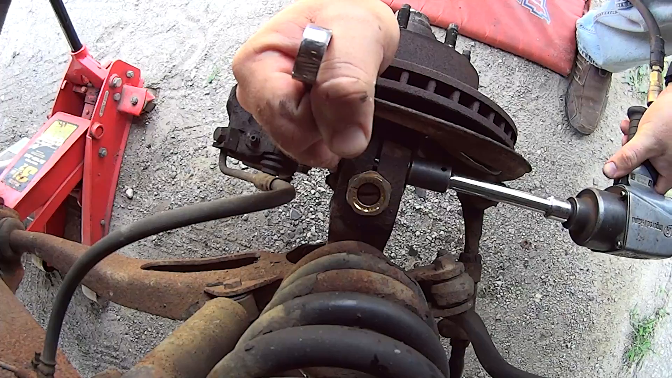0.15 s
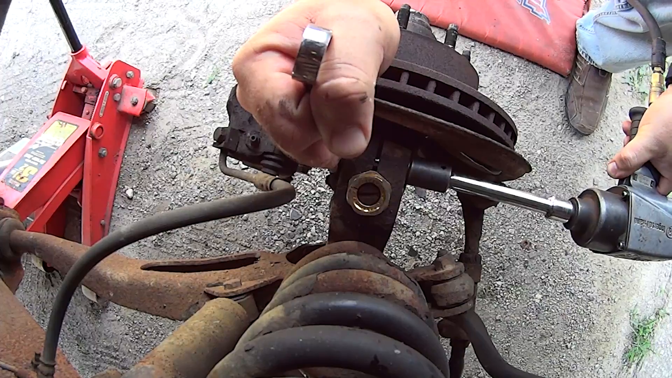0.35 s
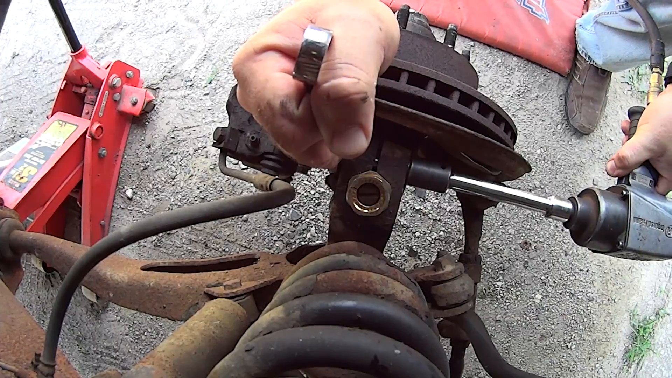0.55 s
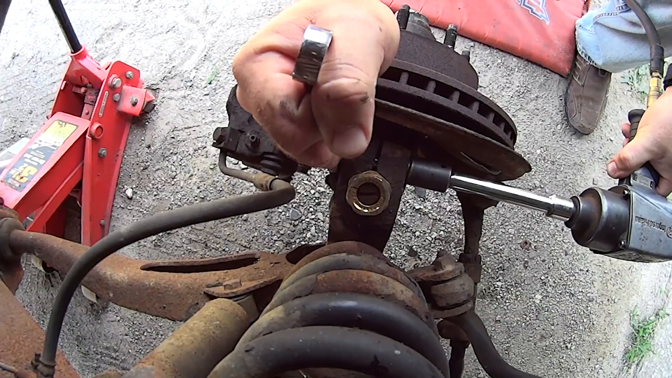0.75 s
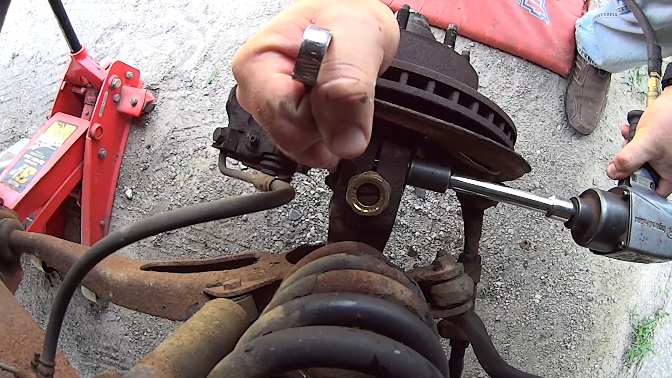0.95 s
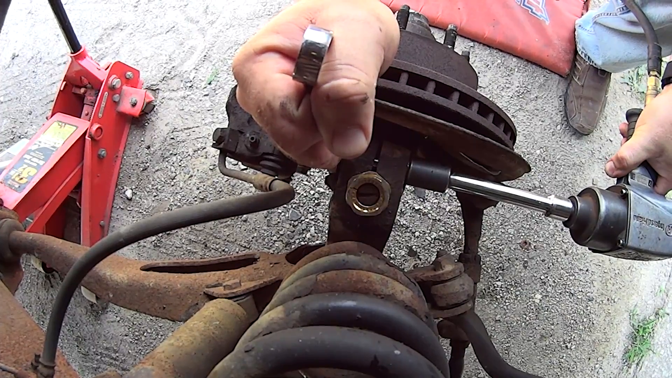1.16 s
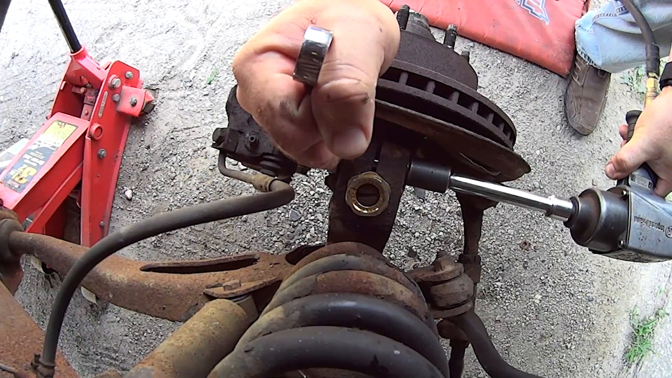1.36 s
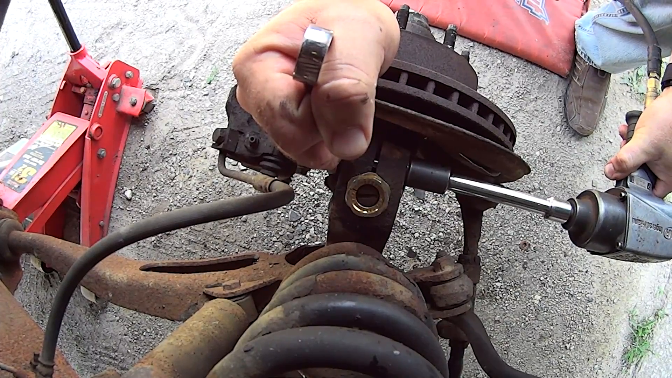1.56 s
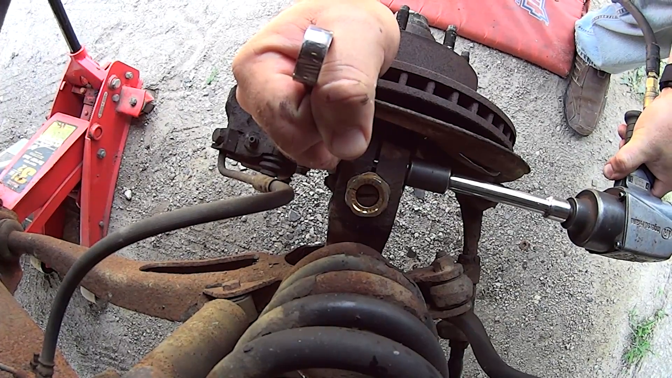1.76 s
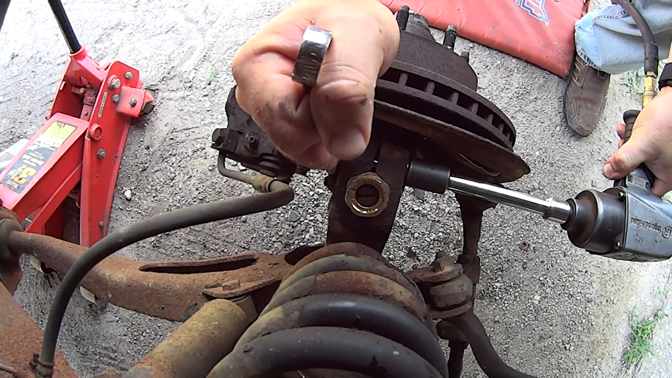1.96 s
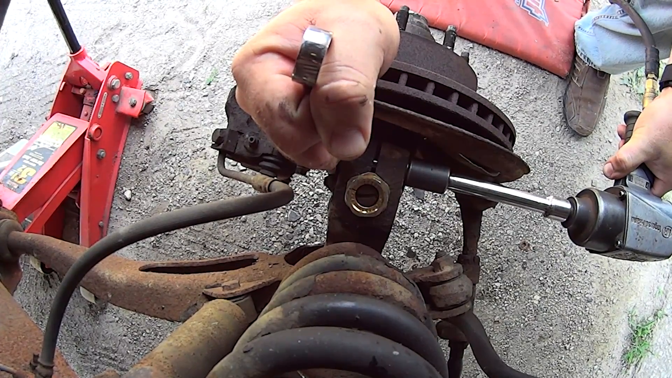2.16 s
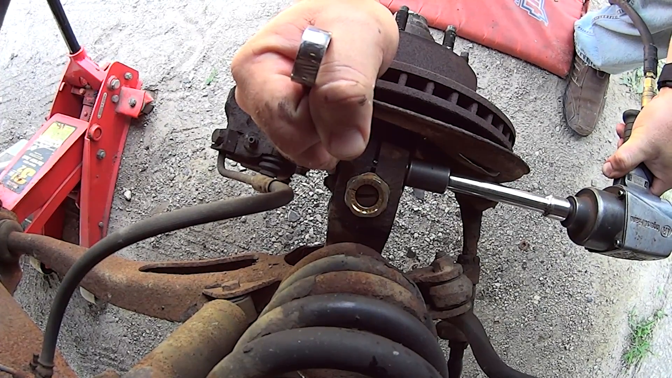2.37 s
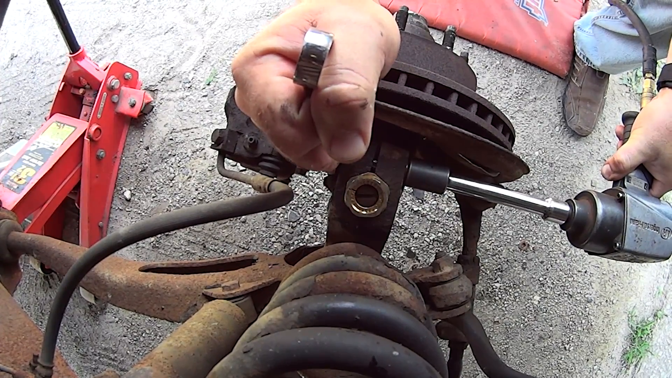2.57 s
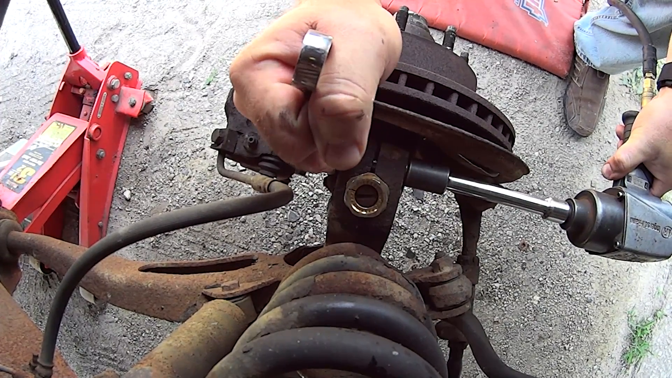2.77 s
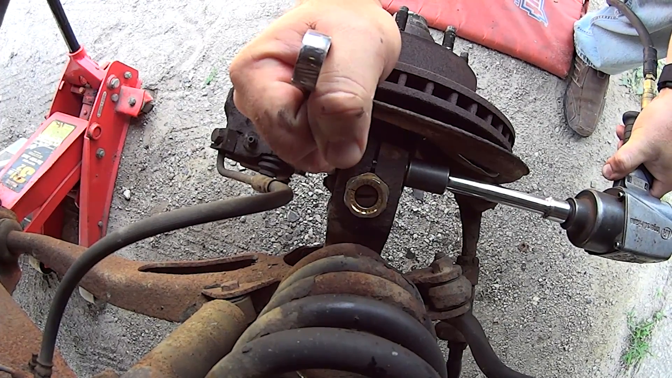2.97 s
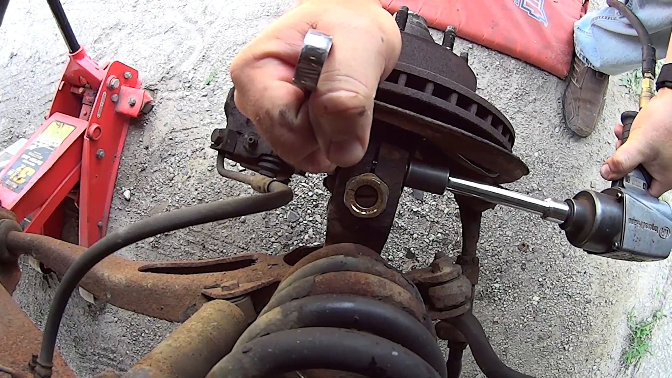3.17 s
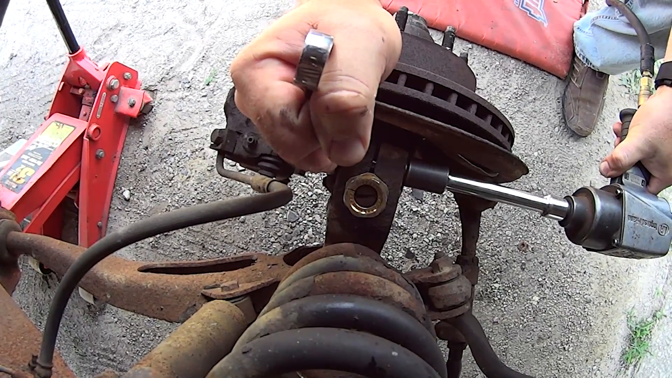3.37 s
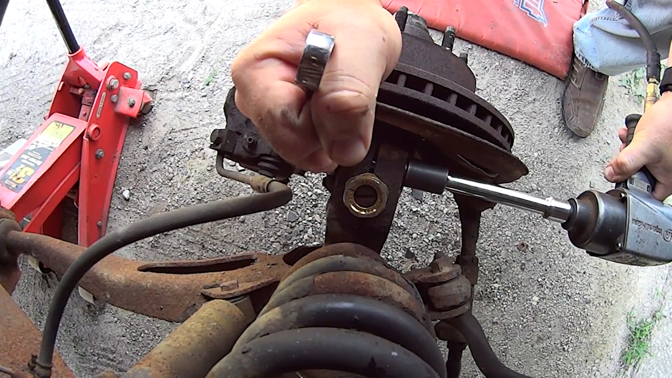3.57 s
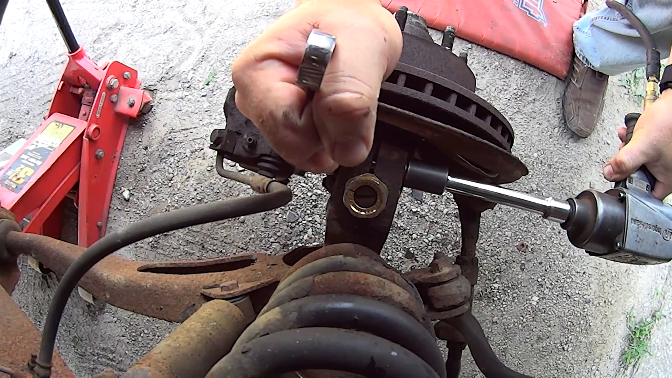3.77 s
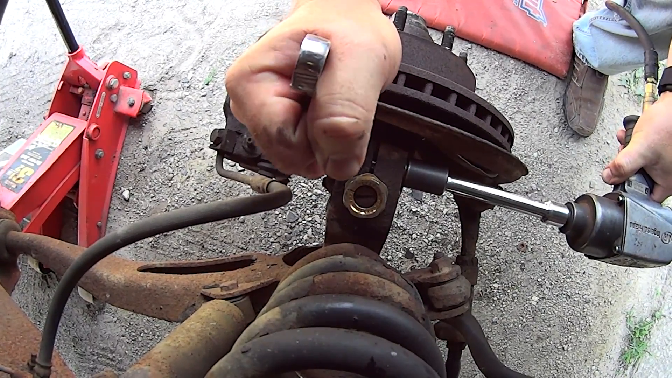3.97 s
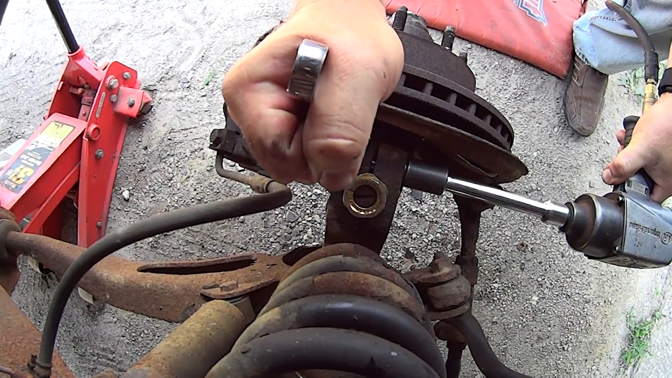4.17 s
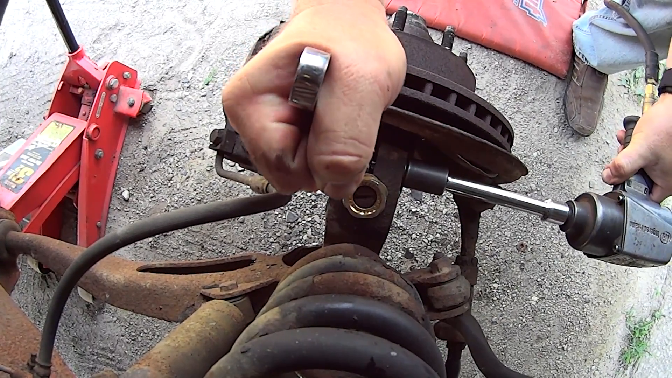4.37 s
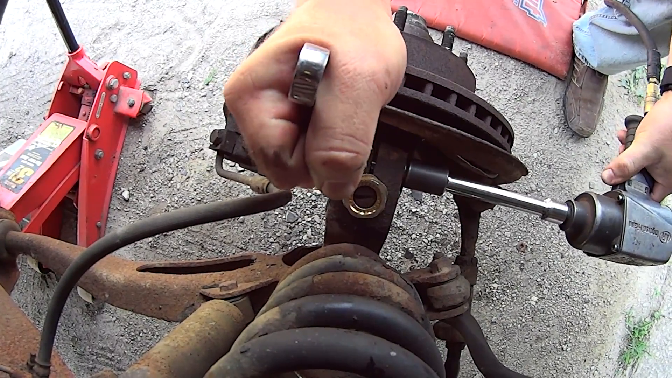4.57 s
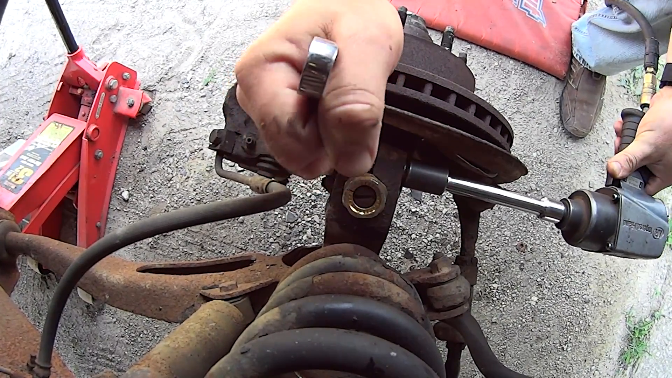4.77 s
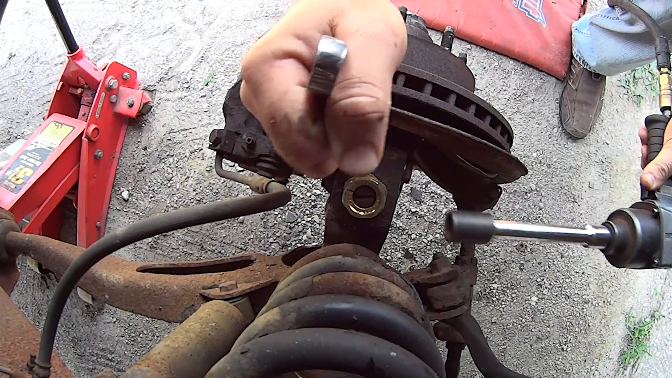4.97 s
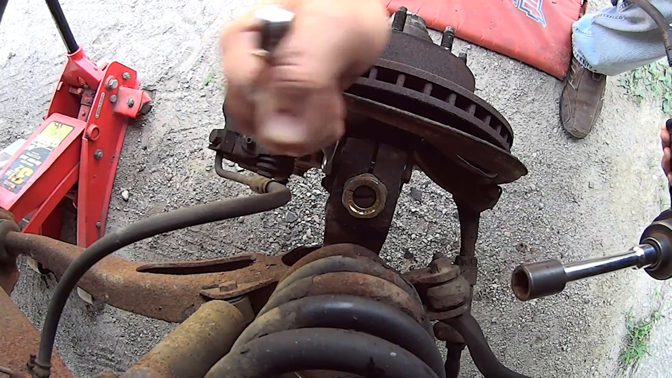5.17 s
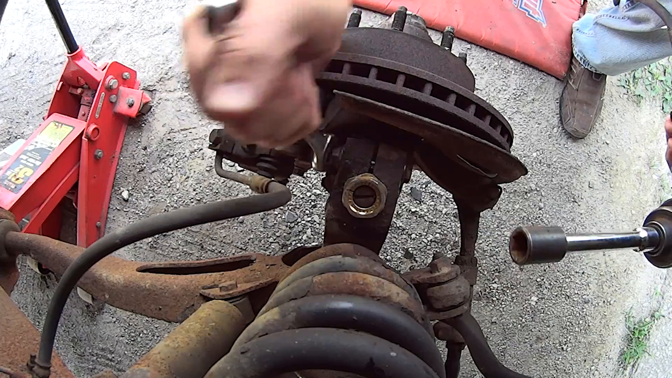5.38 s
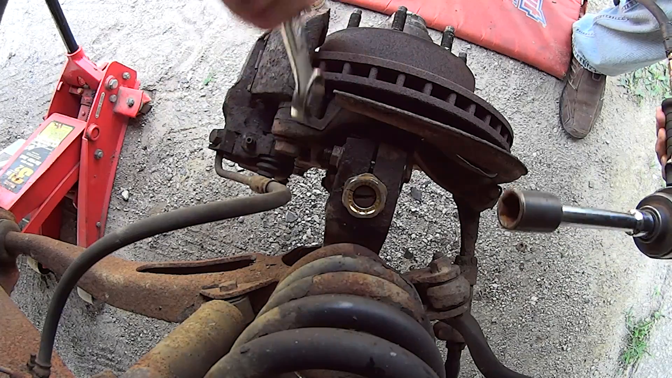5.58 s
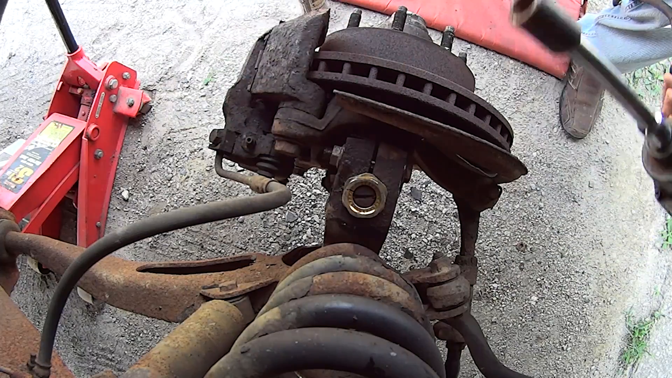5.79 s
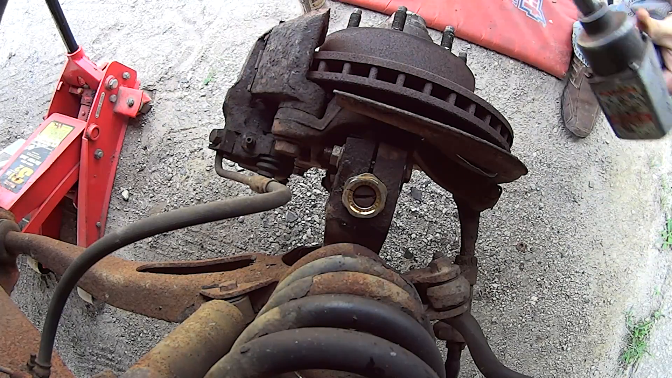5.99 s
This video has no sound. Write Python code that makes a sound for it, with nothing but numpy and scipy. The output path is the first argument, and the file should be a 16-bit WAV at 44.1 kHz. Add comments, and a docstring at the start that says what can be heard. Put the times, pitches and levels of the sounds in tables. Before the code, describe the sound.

Close by, a pneumatic impact wrench gives a short burst, then a long hissing, clanging run, ending with a few soft tool clinks.

```python
"""An air impact wrench tightens a bolt on a car's steering knuckle, close by, over outdoor rumble and hum.
A short burst and a few clinks lead into a long run from 0.35 s: about 17 times a second the hammer
cracks on the anvil, the suspension answers with a falling clang, and the motor spins up with a hiss
and a rattle. The bolt seats near 1.6 s; from 2.2 to 3.2 s the socket rides askew and chinks. At 4.6 s
the trigger is let go and the socket comes off ringing; after 5.1 s a spanner clinks off the nut."""
import sys
import numpy as np
from scipy import signal
from scipy.fft import rfft, irfft, next_fast_len
from scipy.io import wavfile
from scipy.ndimage import uniform_filter1d, minimum_filter1d

SR = 44100
rng = np.random.default_rng(int(sys.argv[2]) if len(sys.argv) > 2 else 0)


def pcm_store(signal):
    """Save signal as 16-bit PCM."""
    levels = np.round(np.clip(np.atleast_2d(signal), -1, 1) * 32767)
    wavfile.write(sys.argv[1], SR, levels.astype(np.int16).T)


N = 265913
TIME_S = np.arange(N) / SR
CUTOFF_HZ = 11100
SIDE_SIGN = np.array([[1], [-1]])


def from_db(db):
    """Decibels to gain."""
    return 10 ** (np.asarray(db) / 20)


def at_hz(curve, hz):
    """Interpolate a curve over log frequency."""
    knots_hz, values = np.transpose(curve)
    return np.interp(np.log(hz + 1e-9), np.log(knots_hz), values)


def noise(spectrum, peaks, side_db):
    """Stereo noise: broad spectrum plus resonances, rms 1."""
    size = next_fast_len(N)
    hz = np.fft.rfftfreq(size, 1 / SR)
    peaks_db = sum(db / (1 + (2 * (hz - peak_hz) / width_hz) ** 2) for peak_hz, width_hz, db in peaks)
    gain = from_db(at_hz(spectrum, hz) + peaks_db) * (hz < CUTOFF_HZ)
    mid, side = irfft(rfft(rng.standard_normal((2, size))) * gain, size)[:, :N]
    stereo = mid + from_db(side_db) * side * SIDE_SIGN
    return stereo / np.sqrt(np.mean(stereo ** 2) + 1e-20)


def clicks(times_s, level_db):
    """One impulse per contact."""
    return np.bincount(np.clip(times_s * SR, 0, N - 1).astype(int), from_db(level_db), N)


def convolve(x, response):
    """Apply an impulse response."""
    return signal.oaconvolve(np.atleast_2d(x), np.atleast_2d(response), axes=1)[:, :N]


def dense_steel(hits, colour, envelope, repeat_share):
    """Countless close modes: part of the ring repeats from hit to hit, the rest is new."""
    repeated = convolve(hits, colour[:, :len(envelope)] * envelope)
    fresh = colour * np.sqrt(np.abs(convolve(hits ** 2, envelope ** 2)))
    return np.sqrt(repeat_share) * repeated + np.sqrt(1 - repeat_share) * fresh


def pings(times_s, level_db, modes, spread_db):
    """Struck, damped modes: random strength per hit, random pan per mode."""
    stereo = np.zeros((2, N))
    for hz, mode_db, t60_s in modes:
        hits = clicks(times_s, level_db + mode_db + spread_db * rng.uniform(-1, 1, len(times_s)))
        radius, angle = from_db(-60 / (t60_s * SR)), 2 * np.pi * hz / SR
        feedback = [1, -2 * radius * np.cos(angle), radius ** 2]
        ring = signal.lfilter([0, np.sin(angle)], feedback, hits + 1e-18)
        stereo += ring * from_db(rng.uniform(-2.2, 3.9) * SIDE_SIGN)
    return stereo


# outdoor noise (frequency [Hz], level [dB])
OUTDOOR_SPECTRUM = [(15, -27), (25, -22), (59, -20), (92, -4.5), (141, -6), (247, -6.5), (336, -6.5),
                    (412, -8), (651, -25.5), (930, -25), (1760, -31), (2270, -29.5), (2930, -33.5),
                    (5670, -31.5), (11000, -40), (14300, -88), (22000, -120)]
# its resonances (frequency [Hz], width [Hz], gain [dB])
OUTDOOR_PEAKS = [(140, 46, 0), (225, 44, 4.5), (310, 97, -6), (410, 50, -9), (945, 75, 11), (1253, 200, 3),
                 (2280, 180, 6.5), (3240, 230, 8.5), (4240, 280, 7.5), (5660, 280, 6.5), (6600, 570, 7.5),
                 (8420, 1500, -2)]
# machine hum (frequency [Hz], level [dB])
HUM_LINES = [(68, -65), (134.6, -58.5), (183, -61.5), (334, -64), (377, -66.5), (700, -76.5)]

def surroundings(air_db=-52, waver_cycles=0.42, waver_step_s=0.1):
    """Outdoor rumble, thin hiss and a distant machine's wavering hum."""
    knots_s, hum = np.arange(0, TIME_S[-1] + 1, waver_step_s), 0
    for hz, db in HUM_LINES:
        drift = waver_cycles * np.interp(TIME_S, knots_s, rng.standard_normal(len(knots_s)))
        hum += from_db(db) * np.sqrt(2) * np.sin(2 * np.pi * (hz * TIME_S + drift))
    return from_db(air_db) * noise(OUTDOOR_SPECTRUM, OUTDOOR_PEAKS, side_db=-9.5) + hum


# trigger (pulled [s], let go [s], motor stops [s])
TRIGGER_PULLS = [(-0.1, .137, 0.215), (0.301, 4.62, 4.655)]
# air flow, valve open (time [s], level [dB])
OPEN_FLOW = [(0, -17.5), (.36, -18), (.7, -19.5), (1.1, -17.5), (1.5, -21), (2, -18.3), (3, -21.5),
             (3.6, -19.5), (4.6, -20)]

def throttle(open_s=0.034, shut_s=0.0083, stop_s=0.006, coast_db=-11, coast_db_per_s=110):
    """Air flow in dB: builds on each pull, sinks as the motor coasts, stops with it."""
    flow = 0
    for pulled_s, let_go_s, stopped_s in TRIGGER_PULLS:
        opening = 1 - np.exp(-np.maximum(TIME_S - pulled_s, 0) / open_s)
        coast_s = np.maximum(TIME_S - let_go_s, 0)
        shutting = np.maximum(np.exp(-coast_s / shut_s), from_db(coast_db - coast_db_per_s * coast_s))
        stopping = np.exp(-np.maximum(TIME_S - stopped_s, 0) / stop_s)
        flow += opening * shutting * stopping
    return np.interp(TIME_S, *np.transpose(OPEN_FLOW)) + 20 * np.log10(flow + 1e-6)


# exhaust hiss (frequency [Hz], level [dB])
EXHAUST_SPECTRUM = [(25, -35), (60, -12), (130, -5), (230, 2.5), (380, 2), (650, 4), (1000, 4), (1450, -2),
                    (1700, -2.5), (2900, 0.5), (3700, -7), (5800, -2.5), (7400, -7.5), (9200, -6.5),
                    (11000, -26)]
# its resonances (frequency [Hz], width [Hz], gain [dB])
EXHAUST_RESONANCES = [(2185, 140, 8.6), (9400, 250, 3)]

def exhaust(blows_s, flow_db, stall_db=-12, stall_s=0.029, ramp_s=0.0053,
            load_db=-6, load_s=0.0057, vane_hz=620, puff_depth=0.36):
    """Each blow stalls the motor; air swells on spin-up and dips as the cam loads. Each vane puffs."""
    next_blow = np.searchsorted(blows_s, TIME_S)
    since_s = TIME_S - np.r_[-stall_s, blows_s][next_blow]
    until_s = np.r_[blows_s, np.inf][next_blow] - TIME_S
    speed = 0.5 + 0.5 * np.tanh((since_s - stall_s) / ramp_s)
    load = 0.5 + 0.5 * np.tanh((load_s - until_s) / ramp_s)
    puffs = 1 + puff_depth * np.sin(2 * np.pi * np.cumsum(vane_hz * speed) / SR)
    level_db = flow_db + stall_db * (1.5 - speed) + load_db * load
    return from_db(level_db) * puffs * noise(EXHAUST_SPECTRUM, EXHAUST_RESONANCES, side_db=-7)


def chatter(level_db, mean_gap_s=0.009, range_db=6):
    """The socket shakes unevenly on the bolt head."""
    slots_s = np.arange(0, N / SR - 2 * mean_gap_s, mean_gap_s)
    delay, softness = rng.random((len(slots_s), 2)).T
    times_s = slots_s + mean_gap_s * delay
    return clicks(times_s, level_db[(times_s * SR).astype(int)] - range_db * softness)


def tightening(times_s, loose_db, tight_db, midpoint_s=1.61, ramp_s=0.36):
    """A level that moves from loose to tight as the bolt seats."""
    tightness = 0.5 + 0.5 * np.tanh((times_s - midpoint_s) / ramp_s)
    return loose_db + (tight_db - loose_db) * tightness


# steady stretches of hammering (start [s], blow rate [Hz])
HAMMER_PACE = [(.021, 18.5), (.354, 18.63), (.944, 20.55), (1.236, 17.5), (1.807, 18.6), (2.075, 17.65),
               (2.302, 19.95), (2.503, 11.9), (2.587, 19.2), (2.639, 16.7), (2.997, 16.1), (3.183, 10.5),
               (3.278, 18.5), (3.480, 16.5), (3.843, 15.97)]
# blow passed into the suspension (time [s], level [dB])
SUSPENSION_DRIVE = [(0, -17), (.55, -17.5), (.98, -18.5), (1.1, -21.5), (1.62, -18.5), (1.85, -24),
                    (2.45, -22), (2.6, -23.5), (3.17, -23), (3.4, -25.5), (3.6, -19), (3.75, -22),
                    (4.05, -19), (4.6, -17.5)]

def hammer(usual_wind_up_s=0.063, wind_up_db_per_s=209, crack_scatter_db=2.6, ring_scatter_db=1.87):
    """Blows while the trigger is held; a longer wind-up or a tighter bolt cracks harder."""
    starts_s, rates_hz = np.transpose(HAMMER_PACE)
    stretches = zip(starts_s, np.r_[starts_s[1:], N / SR], rates_hz)
    blows_s = np.concatenate([np.arange(start, end - 0.5 / hz, 1 / hz) for start, end, hz in stretches])
    wind_up_s = 1 / rates_hz[np.searchsorted(starts_s, blows_s, side="right") - 1]
    crack_draw, ring_draw = rng.standard_normal((len(blows_s), 2)).T
    crack_db = tightening(blows_s, loose_db=-16.5, tight_db=-15.5)
    crack_db += wind_up_db_per_s * (wind_up_s - usual_wind_up_s) + crack_scatter_db * crack_draw
    ring_db = np.interp(blows_s, *np.transpose(SUSPENSION_DRIVE)) + ring_scatter_db * ring_draw
    held = np.any([(blows_s > on_s) & (blows_s < off_s) for on_s, off_s, _ in TRIGGER_PULLS], axis=0)
    return blows_s[held], crack_db[held], ring_db[held]


# socket and extension bar (frequency [Hz], level [dB])
SOCKET_SPECTRUM = [(100, -40), (1500, -28), (2600, -3), (3600, -3.5), (5000, 4), (6400, -3), (7200, 0.5),
                   (8500, -3.5), (9500, -0.5), (11000, -7.5)]
# their resonances (frequency [Hz], width [Hz], gain [dB])
SOCKET_PEAKS = [(4230, 43, 3.5), (4280, 77, 3.2), (5770, 23.3, 1.8), (6320, 220, 9.7), (8090, 620, 8.2),
                (10660, 380, 5.7)]

def socket_crack(hits, t60_s=0.047, snap_db=-4, snap_t60_s=0.015, tail_db=-29, tail_t60_s=0.14):
    """Struck socket and bar: a bright snap, a short ring, a faint tail."""
    t = TIME_S[:SR // 2]
    snap = from_db(snap_db - 60 * t / snap_t60_s)
    tail = from_db(tail_db - 60 * t / tail_t60_s)
    envelope = snap + from_db(-60 * t / t60_s) + tail
    return dense_steel(hits, noise(SOCKET_SPECTRUM, SOCKET_PEAKS, side_db=-9), envelope, repeat_share=0.5)


# socket and bar clamped on the bolt (frequency [Hz], level [dB], t60 [s])
CLAMPED_MODES = [(2150, -21, 0.11), (2572, -9, 0.06), (2857, 2.5, 0.041), (3200, 0, 0.07),
                 (4230, -1.5, 0.06), (4570, 3, 0.02), (5480, -5, 0.091), (6000, 2.5, 0.039),
                 (6610, -7, 0.036), (8200, 4.5, 0.02), (8290, 4.5, 0.029)]

def extension_bar(blows_s, crack_db, gain_db=-10):
    """The socket reseats at every blow, so the bar rings in a new colour."""
    return pings(blows_s, crack_db + gain_db, CLAMPED_MODES, spread_db=12)


# brake disc and knuckle (frequency [Hz], level [dB])
DISC_SPECTRUM = [(40, -31), (400, -12), (800, -4.5), (1100, -3), (1450, -3), (1680, -8), (1950, -3),
                 (2700, -2), (3300, -5), (4200, -11), (7000, -28)]
# their resonances (frequency [Hz], width [Hz], gain [dB])
DISC_PEAKS = [(1340, 31, 3.2), (1514, 45, 6), (1854, 47, 9.1), (2550, 80, 3), (2750, 30, 4), (3080, 25, 4)]

def disc_clang(hits, rise_s=0.00062, t60_s=0.083, tail_db=-24, tail_t60_s=0.41):
    """Disc and knuckle swell just after the crack and outlast it."""
    t = TIME_S[:SR // 2]
    decay = from_db(-60 * t / t60_s) + from_db(tail_db - 60 * t / tail_t60_s)
    envelope = (1 - np.exp(-t / rise_s)) * decay
    return dense_steel(hits, noise(DISC_SPECTRUM, DISC_PEAKS, side_db=-8), envelope, repeat_share=0.35)


# bending of knuckle, arm and strut (frequency [Hz], level [dB], t60 [s])
BENDING_MODES = [(88, -28, 0.068), (123, -21.5, 0.048), (167, -28, 0.07), (216, -12, 0.06),
                 (272.6, -16.5, 0.15), (348, -19, 0.086), (433.3, -15.5, 0.15), (530, -7.5, 0.11),
                 (559.7, -9, 0.12), (698.6, 2, 0.073), (758, -7, 0.1), (790, -11, 0.16), (833, 2, 0.078),
                 (924, 1.5, 0.059), (978.7, -3.5, 0.14), (1153, -9, 0.059), (1284, -6.5, 0.09),
                 (1472, -10, 0.085), (1826, -8, 0.06)]
# coil spring (frequency [Hz], level [dB], t60 [s])
SPRING_MODES = [(178, -33, .7), (220.7, -28, 0.95), (333.7, -37.5, 4.7), (318.5, -39, 2.2),
                (368.4, -37.5, 2.8), (832, -28, .42), (980, -50, 0.52), (1027, -24.5, 0.49)]
# paths through the suspension (travel time at 830 Hz [s], gain [dB])
WAVE_PATHS = [(.006, -6), (.0175, 3)]

def suspension(hits, rise_s=0.0014, side_db=-11):
    """Bending wave speed goes as the root of frequency, so each hit arrives as a falling chirp."""
    t, response = TIME_S[:SR], 0
    for hz, mode_db, t60_s in BENDING_MODES + SPRING_MODES:
        slowness, envelope = np.sqrt(830 / hz), 0
        for travel_s, path_db in WAVE_PATHS:
            age_s = np.maximum(t - travel_s * slowness, 0)
            envelope += (1 - np.exp(-age_s / rise_s)) * from_db(path_db - 60 * age_s / t60_s)
        crest_delay_s = 2 * WAVE_PATHS[-1][0] * slowness  # crests move at half the packet's speed
        phase = 2 * np.pi * hz * (t - crest_delay_s)
        side = from_db(side_db) * np.sin(phase + rng.uniform(0, 2 * np.pi))
        response += from_db(mode_db) * envelope * (np.sin(phase) + side * SIDE_SIGN)
    return convolve(hits, response)


def rattle(blows_s, crack_db, rebound_s=0.028, rebound_db=-7.5, catch_s=0.051, catch_db=-7):
    """After a blow the hammer rebounds, then catches on its cam: two lighter knocks."""
    jitter_s = rng.normal(0, 0.0025, (len(blows_s), 2))
    scatter_db = rng.uniform(-4, 4, (len(blows_s), 2))
    rebounds = clicks(blows_s + rebound_s + jitter_s[:, 0], crack_db + rebound_db + scatter_db[:, 0])
    catches = clicks(blows_s + catch_s + jitter_s[:, 1], crack_db + catch_db + scatter_db[:, 1])
    return rebounds + catches


# loose tool contacts (time [s], disc [dB], socket [dB], suspension [dB], length [s])
TOOL_CLINKS = [(0.194, -38, -48, -34.5, 0.0018), (0.3148, -16, -24, -53, 0.0027),
               (0.335, -12, -16.5, -48, 0.0023), (0.383, -12, -22, -36, 0.0054),
               (4.642, -30, -22.5, -34.5, 0.0065), (4.6866, -21, -16, -28.5, 0.0019),
               (4.797, -52, -57, -53, 0.003), (4.837, -54, -55, -54.5, 0.0018),
               (5.132, -68.5, -50, -78, 0.008), (5.249, -42, -70, -42, 0.005),
               (5.313, -45, -53, -55, 0.034), (5.35, -48, -43, -53, 0.021), (5.434, -40, -41, -49, 0.012)]

def loose_contacts(touches=7, first_db=-7, fade_db=7):
    """Each clink: quick, fading touches on disc and socket, one hit on the suspension."""
    starts_s, disc_db, socket_db, ring_db, length_s = np.transpose(TOOL_CLINKS)
    progress = np.arange(touches) / touches
    jitter = rng.random((len(starts_s), touches)) / touches
    times_s = (starts_s[:, None] + length_s[:, None] * (progress + jitter)).ravel()
    touch_db = first_db - fade_db * progress
    on_disc = clicks(times_s, (disc_db[:, None] + touch_db).ravel())
    on_socket = clicks(times_s, (socket_db[:, None] + touch_db).ravel())
    return on_disc, on_socket, clicks(starts_s, ring_db)


# socket riding askew (frequency [Hz], level [dB], t60 [s])
CHINK_MODES = [(4190, -3, .045), (4300, -6, 0.052)]

def askew_socket(blows_s, crack_db, start_s=2.24, end_s=3.15):
    """While it rides askew, the socket chinks at each blow."""
    askew = (blows_s > start_s) & (blows_s < end_s)
    return pings(blows_s[askew], crack_db[askew], CHINK_MODES, spread_db=7)


# socket leaving the bolt (time [s], level [dB])
RELEASE_HITS = [(4.6878, -18.5), (4.692, -19)]
# free socket (frequency [Hz], level [dB], t60 [s])
FREE_MODES = [(850, -21, 0.085), (979, -18, 0.12), (1290, 1, 0.025), (1482, -12, 0.11), (2970, 3, 0.023),
              (3140, -3, 0.027), (3070, 1, 0.021), (4320, -9, 0.049), (5970, -13, 0.046)]

def socket_release():
    """The socket comes off and rings freely."""
    return pings(*np.transpose(RELEASE_HITS), FREE_MODES, spread_db=2)


# spanner sliding off the nut (time [s], level [dB], contact cutoff [Hz])
SPANNER_TOUCHES = [(5.139, -68, 12000), (5.254, -38, 1900), (5.262, -41, 1500), (5.333, -46, 1100),
                   (5.363, -52, 12000), (5.369, -52, 12000), (5.427, -50, 4000), (5.437, -43, 11990),
                   (5.446, -42, 5010)]
# spanner ring (frequency [Hz], level [dB], t60 [s])
SPANNER_RING = [(970, 0, 0.22), (1515, -6.5, 0.096), (1850, -10, 0.053), (2850, 3, .03), (3610, 5.5, 0.035),
                (3822, -3, 0.04), (6000, 7, .02), (8230, 0, .025), (8700, 7.5, .025), (10300, 1, .03)]

def spanner():
    """Each touch rings the spanner; a soft one barely stirs the high modes."""
    stereo = 0
    for time_s, level_db, cutoff_hz in SPANNER_TOUCHES:
        modes = [(hz, db - 10 * np.log10(1 + (hz / cutoff_hz) ** 4), t60_s)
                 for hz, db, t60_s in SPANNER_RING]
        stereo += pings(np.array([time_s]), level_db, modes, spread_db=2)
    return stereo


def scene():
    """Blows and clinks excite socket, disc and suspension; the exhaust hisses between blows."""
    flow_db = throttle()
    blows_s, crack_db, ring_db = hammer()
    blows = clicks(blows_s, crack_db)
    play_db = tightening(TIME_S, loose_db=5, tight_db=0.1)  # the socket loses its play
    motor_driven = flow_db > -30
    knocks = motor_driven * (rattle(blows_s, crack_db) + chatter(flow_db + play_db - 8.5))
    on_disc, on_socket, on_suspension = loose_contacts()
    crack = socket_crack(from_db(3.5) * blows + from_db(-0.5) * knocks + on_socket)
    bar = extension_bar(blows_s, crack_db)
    chinks = askew_socket(blows_s, crack_db)
    clang = disc_clang(from_db(play_db - 5) * (from_db(4) * blows + knocks) + on_disc)
    ring = suspension(from_db(-2.5) * (clicks(blows_s, ring_db) + on_suspension))
    tools_off = socket_release() + spanner()
    hiss = from_db(5) * exhaust(blows_s, flow_db)
    return surroundings() + hiss + crack + bar + clang + ring + chinks + tools_off


def limiter(x, threshold_db=-14.5, slope=0.89, release_db_per_s=650, ahead_s=0.0018):
    """The gain ducks just ahead of each loud crack and recovers within milliseconds."""
    power = uniform_filter1d(np.mean(x ** 2, axis=0), size=64)
    excess_db = np.maximum(10 * np.log10(np.abs(power) + 1e-12) - threshold_db, 0)
    reach = int(ahead_s * SR / 2)
    cut_db = -minimum_filter1d(-slope * excess_db, 2 * reach + 1, origin=-reach)
    release_db = release_db_per_s * TIME_S
    held_db = np.maximum.accumulate(cut_db + release_db) - release_db
    return x * from_db(-uniform_filter1d(held_db, size=32))


# left channel behind right (frequency [Hz], phase lag [rad])
LEFT_LAG = [(60, .1), (200, 0.16), (350, 1.35), (520, 1.52), (780, 0.77), (1800, 0.93), (3200, 0.6),
            (5700, 0.33), (9000, 0.12)]

def record(dry, left_db=-0.04, right_db=1.35):
    """Left slightly later and softer; peaks limited and rounded, top cut."""
    size = next_fast_len(N + SR // 10)
    lag_rad = at_hz(LEFT_LAG, np.fft.rfftfreq(size, 1 / SR))
    left = irfft(rfft(dry[0], size) * np.exp(-1j * lag_rad), size)[:N]
    stereo = np.array([from_db(left_db) * left, from_db(right_db) * dry[1]])
    lowpass = signal.ellip(12, 0.1, 80, CUTOFF_HZ, fs=SR, output="sos")
    return signal.sosfilt(lowpass, np.tanh(limiter(stereo)))


dry = scene()
out = record(dry)
pcm_store(out)
```